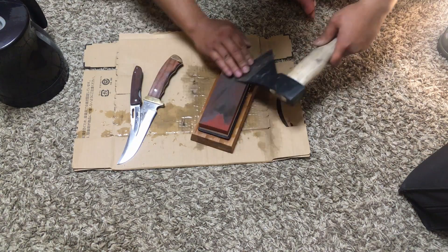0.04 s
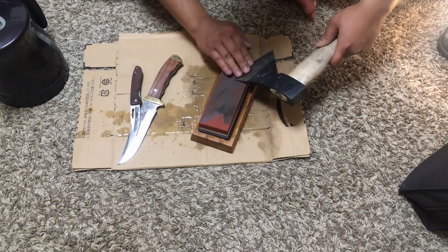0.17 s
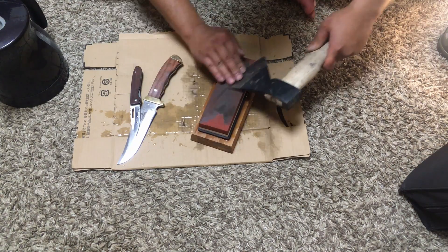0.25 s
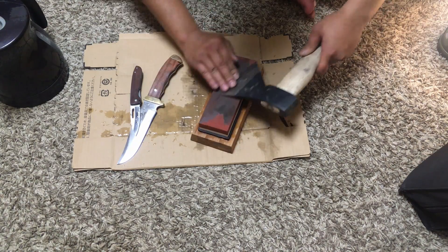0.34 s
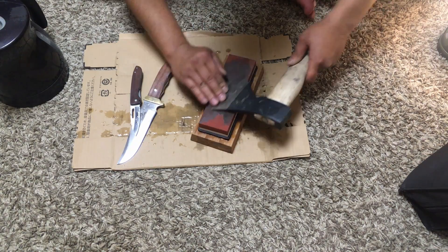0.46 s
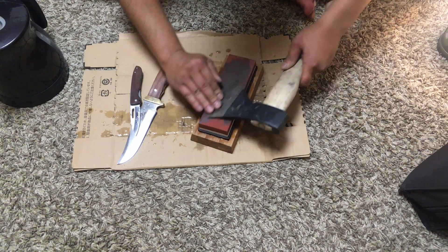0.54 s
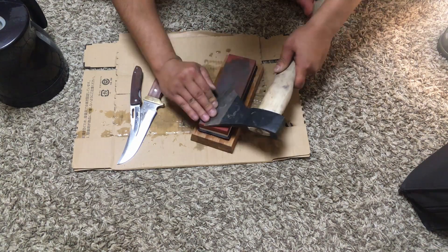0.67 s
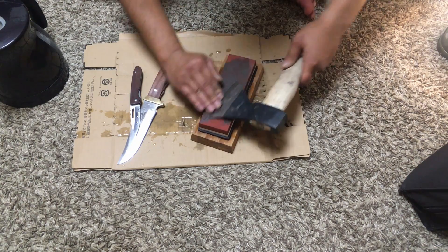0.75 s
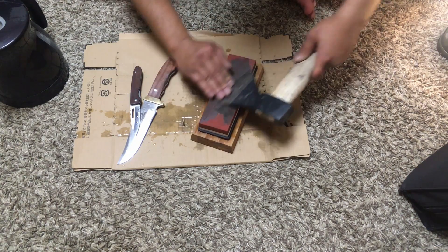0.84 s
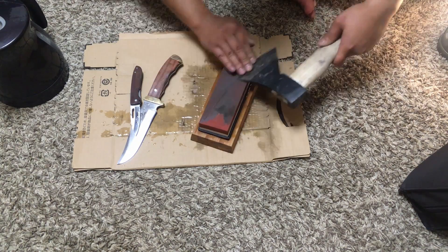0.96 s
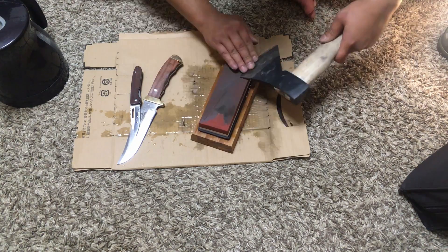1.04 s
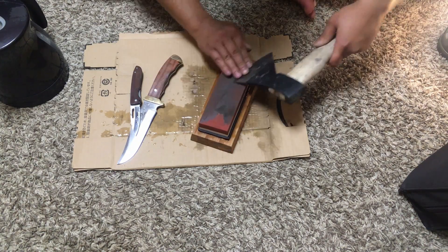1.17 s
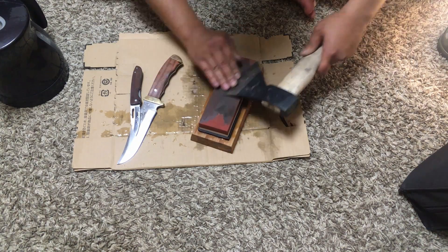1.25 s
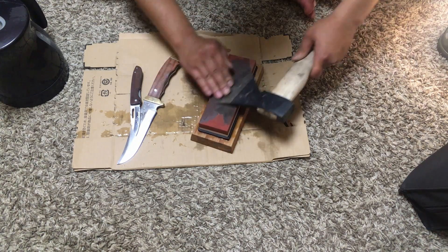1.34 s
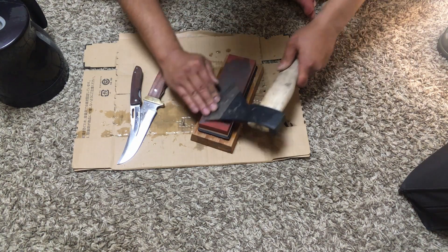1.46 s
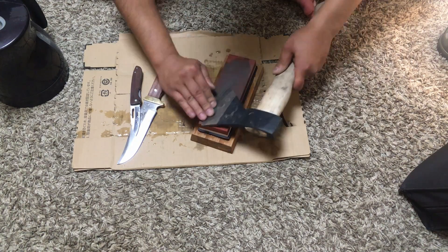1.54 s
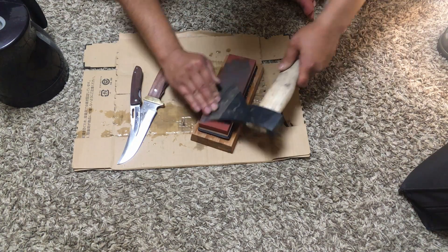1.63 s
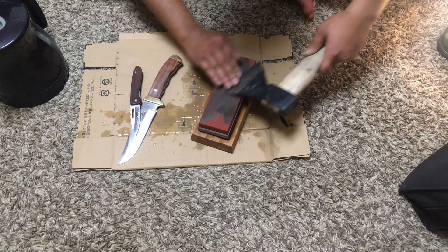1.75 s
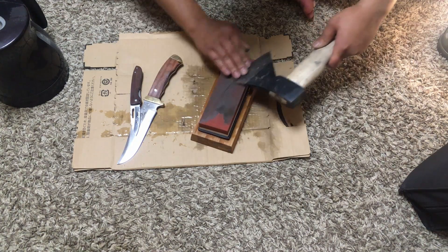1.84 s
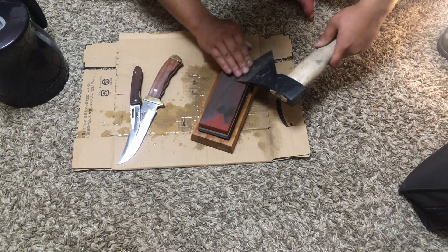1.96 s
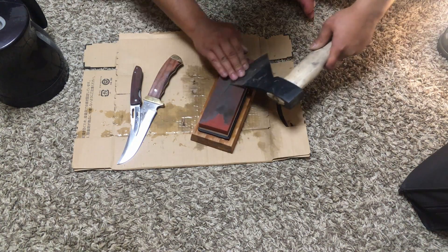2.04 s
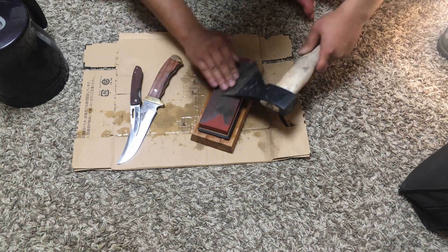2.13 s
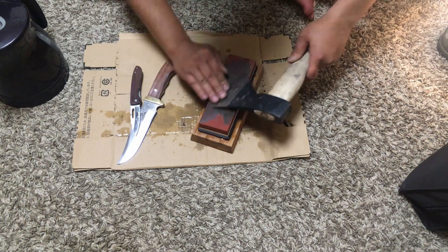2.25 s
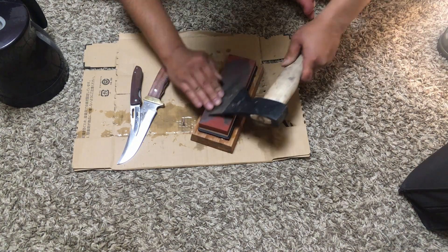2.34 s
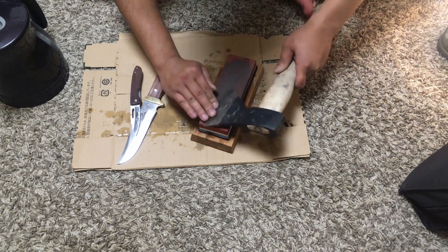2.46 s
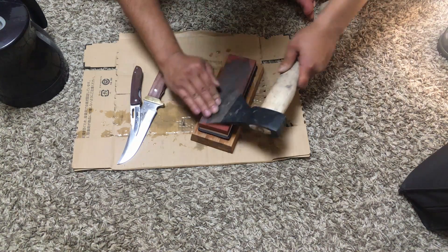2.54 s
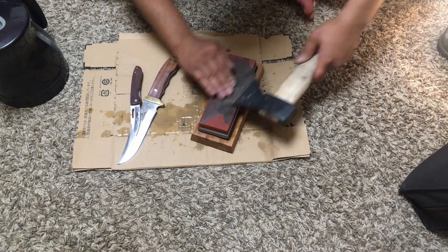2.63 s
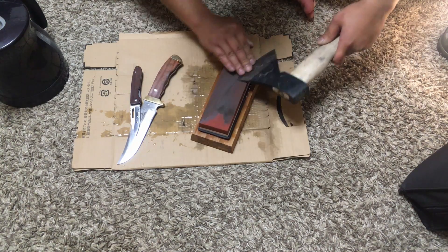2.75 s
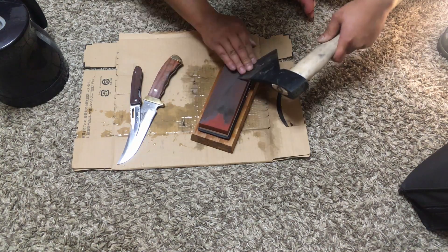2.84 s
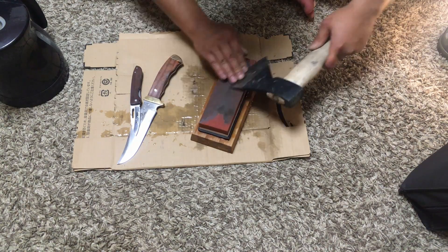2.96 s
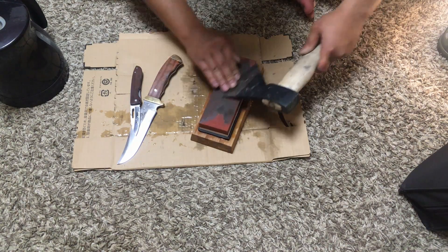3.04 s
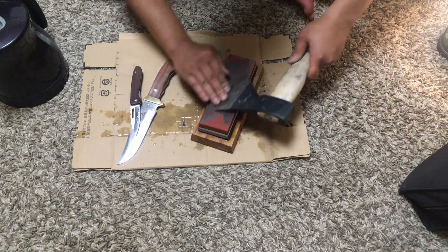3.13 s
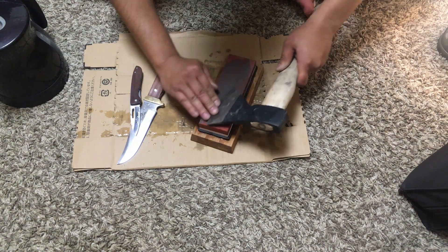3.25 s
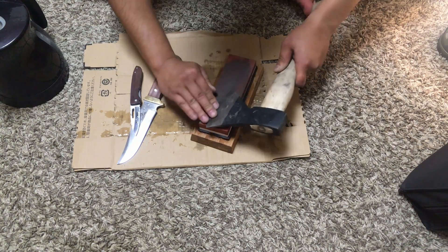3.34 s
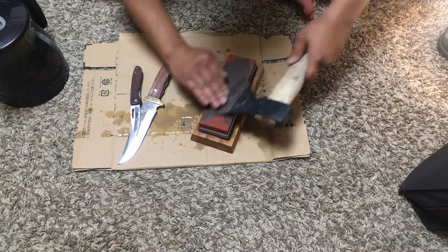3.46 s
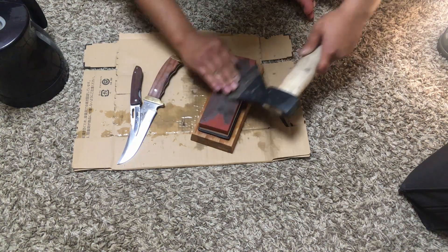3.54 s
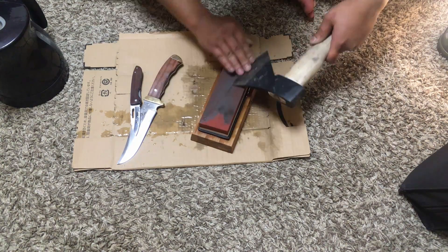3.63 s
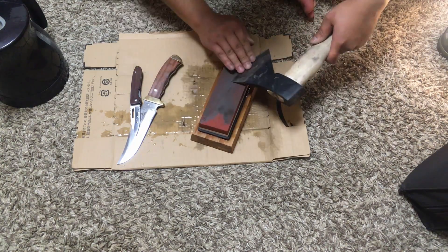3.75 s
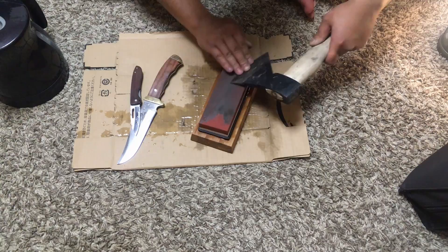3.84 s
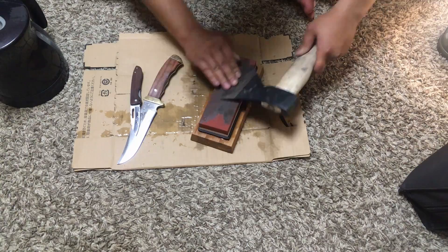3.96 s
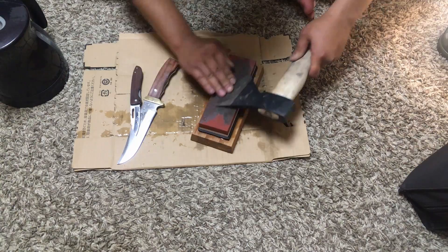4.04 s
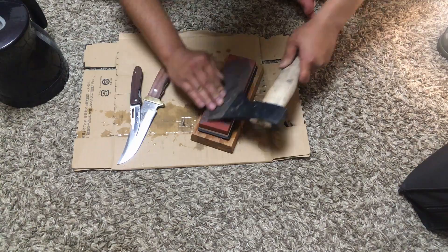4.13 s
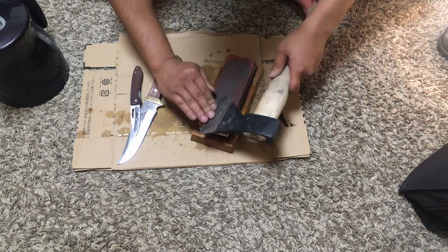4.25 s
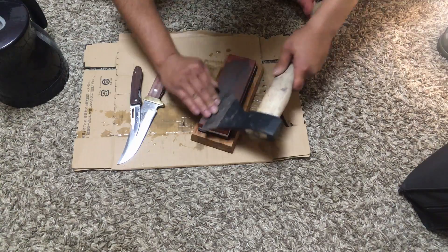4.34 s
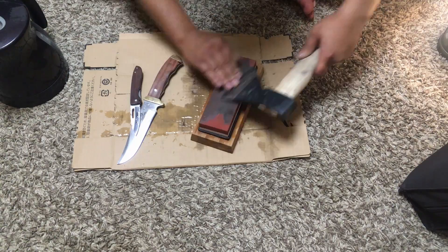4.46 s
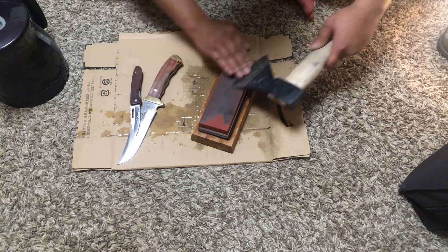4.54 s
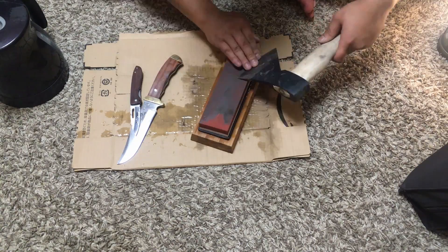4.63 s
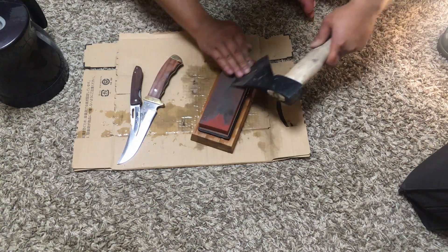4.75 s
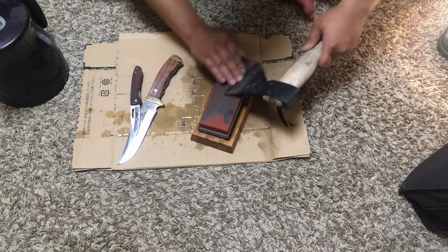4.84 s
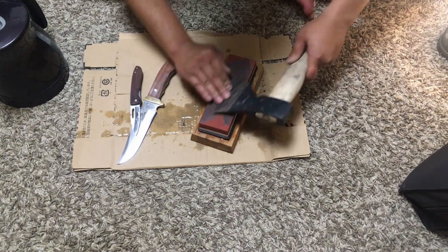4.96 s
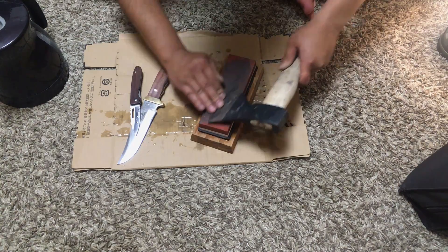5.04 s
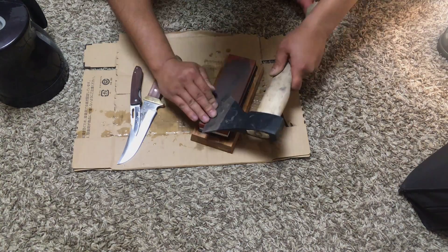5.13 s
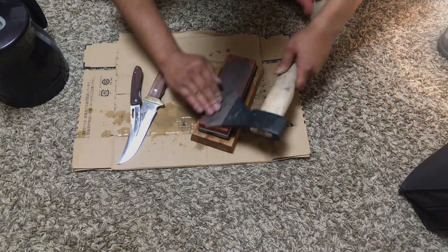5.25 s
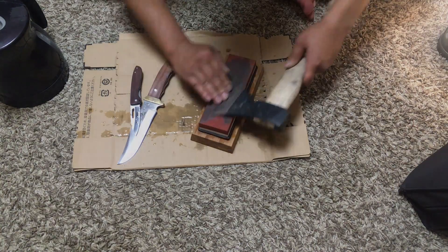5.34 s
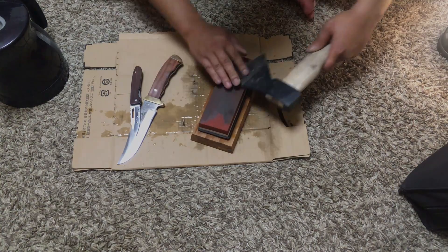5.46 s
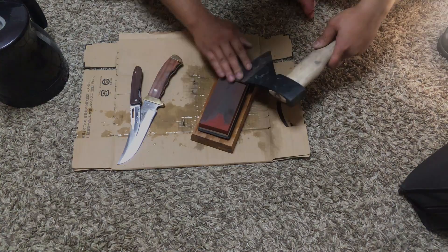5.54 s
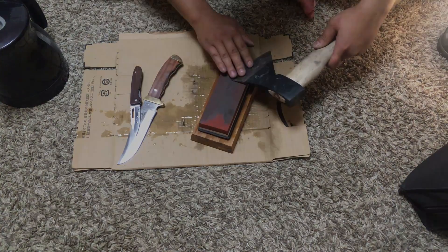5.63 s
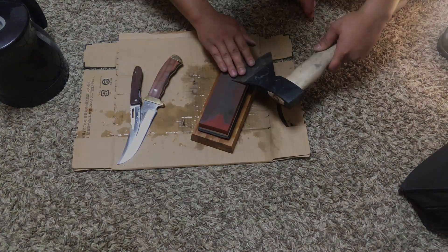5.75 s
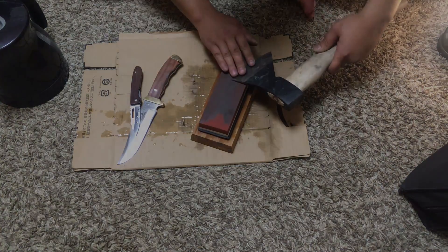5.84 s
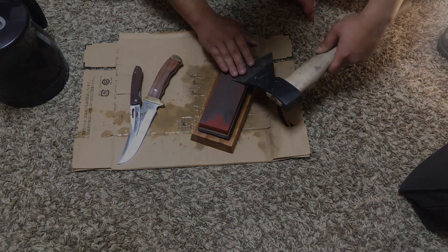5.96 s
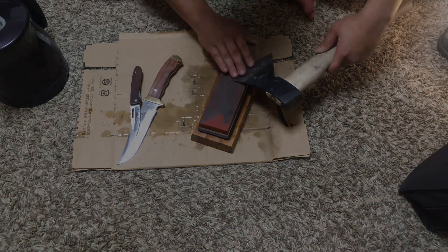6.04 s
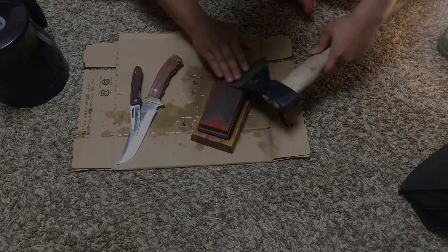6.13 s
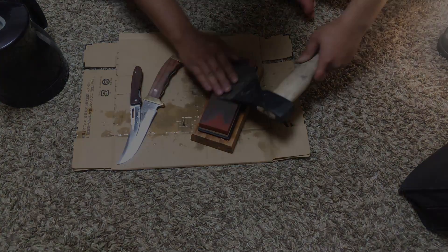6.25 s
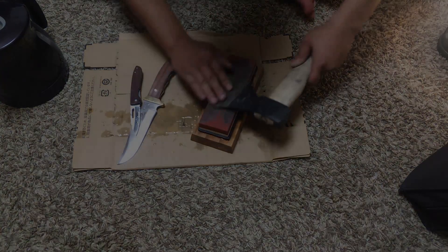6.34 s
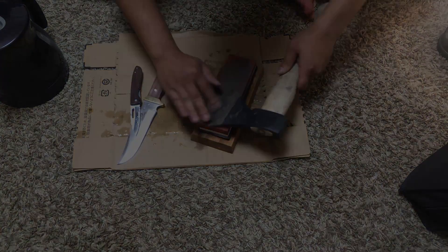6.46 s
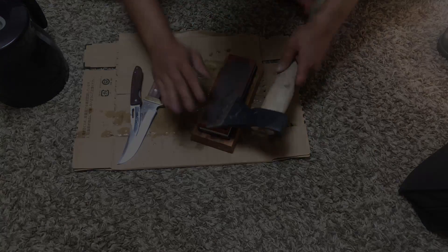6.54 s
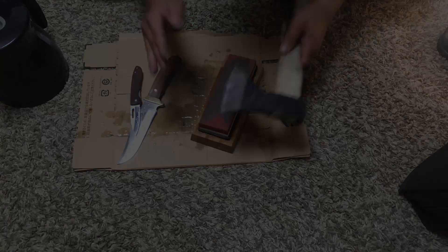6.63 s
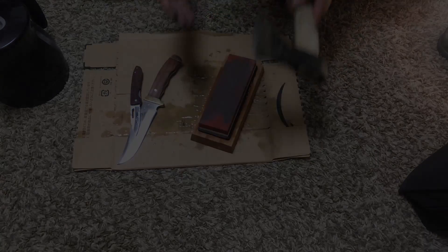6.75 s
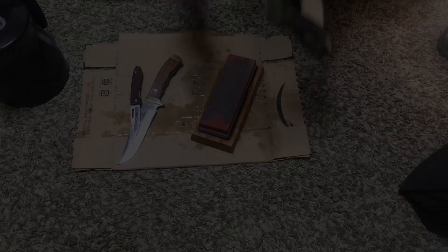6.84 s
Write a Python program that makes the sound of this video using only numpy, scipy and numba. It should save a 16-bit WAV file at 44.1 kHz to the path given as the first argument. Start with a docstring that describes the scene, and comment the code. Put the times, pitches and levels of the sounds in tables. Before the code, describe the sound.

An axe is honed on a wet whetstone in a quiet carpeted room, dry and heard only on the left. It opens mid-stroke with a bright, gritty rasp. Longer, softer pushes then alternate with brisk, louder returns, which peak at about 0.9, 1.8, 2.7, 3.6, 4.5 and 5.5 seconds. The grit makes the steel ring in high tones that slide up and down within each stroke, while the stone adds a hollow undertone. The stone knocks lightly on its wooden base around 1 second, most clearly at 1.8, and again at 4.9. From 5.6 seconds the work pauses, with two faint grazes. A last push runs from about 6.1 to 6.6 seconds, ending with a small scuff, a soft knock and a brief, thin ring as the axe lifts off. Faint low rumble, hum and hiss lie underneath, the hiss rising slightly at the end.

```python
"""A quiet carpeted room: an axe is stroked back and forth on a wet whetstone on a wooden base.
Grit rasps the edge and rings the steel head, whose resonances glide as the contact travels along the edge.
The stone adds a hollow undertone and rocks on its base, knocking. At the end the axe lifts off and
rings freely for a moment. Faint rumble, hum and hiss lie beneath. Only the left channel sounds."""
import sys
import numpy as np
from scipy import signal
from scipy.fft import rfft, irfft, next_fast_len
from scipy.io import wavfile
from scipy.ndimage import uniform_filter1d
from numba import njit

SR = 44100
rng = np.random.default_rng(int(sys.argv[2]) if len(sys.argv) > 2 else 0)


def transcribe(signal):
    """Save signal, clipped to [-1, 1], as a 16-bit WAV file at the path in sys.argv[1]."""
    frames = np.atleast_2d(signal).T
    limited = np.clip(frames, -1, 1)
    pcm = np.round(limited * 32767).astype(np.int16)
    wavfile.write(sys.argv[1], SR, pcm)


N = 303849
TIME = np.arange(N) / SR
HEEL, BELLY = 0.2005, 0.564   # places along the edge, 0-1


def friction(grains_per_s=7000, slurry_db=-3, judder_db=1.16, judder_hz=90):
    """Grit fractures in dense random clicks over the smooth shear of the slurry; the edge judders."""
    grains = rms_one(rng.choice([-1, 1], N) * (rng.random(N) < grains_per_s / SR))
    slurry = from_db(slurry_db) * rng.standard_normal(N)
    return (grains + slurry) * from_db(judder_db * drift(judder_hz))


# Second and third gliding modes. Each row: free frequency in Hz, level in dB.
UPPER_GLIDES = [(5110, -2), (9210, 5.5)]
# Modes drawn along by the third glide. Each row: free frequency in Hz, share of its shift,
# width in Hz, level in dB, extra dB per dB of bearing.
EDGE_MODES = [(6903, 0.074, 530, -9.5, -1.1), (8144, 0.063, 160, -4, 1.5), (8900, 0.25, 840, -6, 1.14),
              (11120, 0.17, 270, -4.5, 0.2), (12840, 0.092, 490, -4, 0.9), (14200, .05, 300, -7.5, 1.2)]
# Thin bevel's mode. One row: centre in Hz, swing in Hz, period in edge lengths, level in dB.
BEVEL_MODE = (14650, 330, 0.305, 0)
# Direct sound of the grit. Each row: frequency in Hz, gain in dB.
RASP_SPECTRUM = [(300, -27.5), (1500, -3.5), (2300, -9.5), (2900, 1.5), (4700, -0.5), (6400, 1),
                 (9500, -24), (10500, -3.5), (14500, 8), (16000, -12)]


def edge(force, place, first_hz, second_hz, third_hz, bearing_db, excess_db, glide_width_hz=270,
         rise_db_per_khz=4.5, twist_hz=7970, damping=0.25, tilt_db=3, tilt_hz=6, grit_db=-20):
    """The thin edge rings in high modes over the direct rasp of the grit."""
    (second_free_hz, second_db), (third_free_hz, third_db) = UPPER_GLIDES
    shift_hz = third_hz - third_free_hz
    rise_db = rise_db_per_khz * (second_hz - second_free_hz) / 1000
    # Each row: frequency in Hz, free frequency in Hz, width in Hz, level in dB.
    modes = [(second_hz, second_free_hz, glide_width_hz, second_db + rise_db),
             (third_hz, third_free_hz, glide_width_hz, third_db)]
    for free_hz, share, width_hz, db, follows in EDGE_MODES:
        modes.append((free_hz + share * shift_hz, free_hz, width_hz, db + follows * bearing_db))
    # A twisting mode rises with the first glide and moves against the third.
    twist_shift_hz = 0.5 * (first_hz - first_hz.mean()) - 0.26 * shift_hz
    modes.append((twist_hz + twist_shift_hz, twist_hz, 350, -3))
    bevel_hz, swing_hz, period, bevel_db = BEVEL_MODE
    ripple_hz = 230 * drift(tilt_hz) - swing_hz * np.cos(2 * np.pi * (place - HEEL) / period)
    modes.append((bevel_hz + ripple_hz, bevel_hz, 640, bevel_db + 0.23 * excess_db))
    steel = 0
    for hz, free_hz, width_hz, db in modes:
        loaded_hz = width_hz + damping * np.abs(hz - free_hz)   # pulled further, damped more
        gain = from_db(db + tilt_db * drift(tilt_hz))   # small tilts favour one mode or another
        steel += gain * width_hz / loaded_hz * resonate(scatter(force), hz, loaded_hz)
    return steady(steel + from_db(grit_db) * colour(force, RASP_SPECTRUM))


# Stationary modes. Each row: frequency in Hz, width in Hz, level in dB, extra dB per dB of bearing.
BENDING_MODES = [(1767, 237, -11.5, 0.6), (2745, 131, -0.5, 1), (2912, 102, -1.5, -0.5),
                 (3192, 210, 1.5, -.15), (3610, 350, -10.5, 0.4), (3820, 203, -3.5, 0.5)]


def head(force, first_hz, bearing_db, glide_db=-2.5, rise_db_per_khz=7, pivot_hz=3700, cluster_db=-2):
    """The thick head rings in a cluster of bending modes; the first glide sings out as it climbs."""
    cluster = sum(from_db(db + follows * bearing_db) * resonate(scatter(force), hz, width_hz)
                  for hz, width_hz, db, follows in BENDING_MODES)
    rise_db = rise_db_per_khz * (first_hz - pivot_hz) / 1000
    wobble_hz = 45 * drift(rate_hz=12)
    glide = steady(resonate(force, first_hz + wobble_hz, width_hz=300))
    return from_db(glide_db + rise_db) * glide + from_db(cluster_db + bearing_db) * steady(cluster)


# Outward strokes. Each row: start, heel passage, belly passage and end in seconds, place reached 0-1,
# draw on the first glide past the belly 0-1, level in dB, hardest lean in seconds, lean gain in dB,
# stone offset in dB.
PUSHES = [(0.16, 0.29, 0.59, 0.73, .78, .55, -49.2, 0.59, 6, 4.5),
          (1.118, 1.27, 1.5, 1.63, .76, .55, -47.2, 1.56, 4, 3),
          (1.96, 2.134, 2.29, 2.535, .89, 1, -48.6, 2.437, 2.5, -1),
          (2.855, 2.99, 3.12, 3.388, .99, 1, -47.7, 3.261, 4.5, -1),
          (3.826, 3.917, 4.06, 4.337, .9, .97, -48.7, 4.222, 4.3, 0),
          (4.675, 4.792, 4.98, 5.226, .9, .95, -48.8, 5.098, 5.2, 0),
          (6.068, 6.189, 6.35, 6.605, .88, 1, -49.7, 6.486, 6, 0)]
# Brisk return strokes. Each row: start, heel passage, peak and end in seconds, peak level in dB,
# stone offset in dB.
PULLS = [(-0.25, -0.1, 0, 0.158, -39, -1), (0.723, 0.803, 0.938, 1.101, -37.6, 1),
         (1.62, 1.742, 1.788, 1.969, -36, -1), (2.53, 2.649, 2.697, 2.89, -36.8, 1),
         (3.376, 3.552, 3.572, 3.78, -37.8, 0), (4.323, 4.505, 4.52, 4.709, -37, -1),
         (5.238, 5.46, 5.478, 5.647, -34.7, -1)]
# The axe grazes the stone in the pause. Each row: time in seconds, half length in seconds, level in dB.
GRAZES = [(5.673, 0.029, -66.5), (5.863, 0.03, -61.5)]
# The edge catches on coarse grit. Each row: time in seconds, gain in dB.
GRIT_CATCHES = [(1.204, 6), (2.07, 2), (3.98, 7), (4.91, 6), (6.24, 1.5), (6.32, 4)]
PUSH_ATTACK_S, PUSH_RELEASE_S = 0.13, 0.083
PULL_ATTACK_S, PULL_RELEASE_S = 0.035, 0.089


def stroke_effort(resting_db=-72, swell_db_per_s=86, sag_db_per_s=75, tremor_db=1.11, tremor_hz=14):
    """Strength of the rasp: pushes hold level until the hand leans in, pulls swell and sag."""
    effort = from_db(resting_db) + sum(from_db(db) * swell(s, half_s) for s, half_s, db in GRAZES)
    for start, _, _, end, _, _, db, lean_s, lean_db, _ in PUSHES:
        level = from_db(db + lean_db * swell(lean_s, half_s=0.04))
        effort += level * gate(start, end, PUSH_ATTACK_S, PUSH_RELEASE_S)
    for start, _, peak, end, db, _ in PULLS:
        below_db = np.maximum(swell_db_per_s * (peak - TIME), sag_db_per_s * (TIME - peak))
        effort += from_db(db - below_db) * gate(start, end, PULL_ATTACK_S, PULL_RELEASE_S)
    catch_db = sum(db * swell(s, half_s=0.018) for s, db in GRIT_CATCHES)
    return effort * from_db(catch_db + tremor_db * drift(tremor_hz))


# Gliding modes by contact point. Each row: place 0-1, first, second and third frequency in Hz.
GLIDES_BY_PLACE = [(0, 3150, 5860, 9840), (.06, 3650, 6000, 10050), (.12, 3880, 5700, 8970),
                   (.2, 3930, 5100, 10100), (.32, 3370, 5640, 9500), (.42, 3150, 6060, 9200),
                   (.5, 3270, 5960, 9600), (.55, 3540, 5800, 10800), (.7, 4040, 5240, 10050),
                   (.77, 4370, 5500, 9200), (1, 4070, 5640, 9900)]


def travelling_contact(push_from=0.055, pull_from=0.467, pull_draw=0.66, first_rest_hz=3120):
    """The contact runs out along the edge and back; its place tunes three gliding modes."""
    path = []   # Each row: time in seconds, place 0-1, share of the first glide's shift from rest.
    for start, heel_s, belly_s, end, reach, draw, *_ in PUSHES:
        path += [(start, push_from, 1), (heel_s, HEEL, 1), (belly_s, BELLY, 1),
                 ((belly_s + end) / 2, (BELLY + reach) / 2, draw),
                 (end - PUSH_RELEASE_S / 2, reach, draw)]
    for start, heel_s, _, end, *_ in PULLS:
        path += [(start + PULL_ATTACK_S / 2, pull_from, pull_draw), (heel_s, HEEL, pull_draw),
                 (end - PULL_RELEASE_S, 0, pull_draw)]
    place, draw = in_time(sorted(path))
    place += 0.011 * drift(rate_hz=14)   # uneven hand
    places, *columns = np.transpose(sorted(GLIDES_BY_PLACE))
    first_hz, second_hz, third_hz = [np.interp(place, places, hz) for hz in columns]
    return place, first_rest_hz + draw * (first_hz - first_rest_hz), second_hz, third_hz


# Weight through a push and through a pull. Each row: share of the stroke, head's bearing in dB,
# stone pitch in Hz, stone level in dB.
PUSH_WEIGHT = [(.1, 2, 1190, -4.5), (.5, -3.5, 1263, -4.5), (.72, -5.5, 1310, 2), (.95, -1, 1250, 3)]
PULL_WEIGHT = [(.05, -3, 1210, 5), (.22, -4, 1053, -0.5), (.4, -1, 920, -7), (.55, 1, 1130, -5),
               (.85, 4, 1133, 2)]


def weight_shift():
    """Weight shifts in each stroke, setting how hard the head bears and the stone's pitch and level."""
    rows = []
    for strokes, shape in ((PUSHES, PUSH_WEIGHT), (PULLS, PULL_WEIGHT)):
        for start, _, _, end, *_, stone_db in strokes:
            for share, bearing_db, hz, db in shape:
                rows.append((start + share * (end - start), bearing_db, hz, db + stone_db))
    return in_time(sorted(rows))


def stone(force, pitch_hz, level_db, upper_db=-9, tilt_db=3):
    """The stone under the axe gives a hollow undertone from two broad resonances."""
    upper_gain = from_db(upper_db + tilt_db * drift(rate_hz=2.74))
    upper = upper_gain * resonate(scatter(force), hz=1800, width_hz=450)
    return from_db(level_db) * steady(resonate(force, pitch_hz, width_hz=230) + upper)


# Short knocks and rattles from the base, mostly as the stone rocks. Each row: start in seconds, level in dB.
KNOCKS = [(0.921, -41), (1.0, -39), (1.767, -34.5), (4.905, -42), (6.539, -48)]
# Modes of the base. Each row: frequency in Hz, level in dB, T60 in seconds.
WOOD_MODES = [(310, -3.5, 0.21), (374, -6.5, 0.092), (547, -9.5, 0.031), (630, -8.5, 0.029),
              (863, -3.5, 0.032), (1083, -21, 0.2)]


def wooden_base(force, bearing_db, knock_db=-9, rattle_s=0.022, rub_db=-51):
    """The base grumbles as the head bears down and knocks in short rattles when the stone rocks."""
    drive = from_db(rub_db + bearing_db) * force
    for start_s, db in KNOCKS:
        onset = int(start_s * SR)
        rattle = rng.standard_normal(N - onset) * np.exp(-TIME[:N - onset] / rattle_s)
        drive[onset:] += from_db(db + knock_db) * rattle / np.linalg.norm(rattle)
    return sum(from_db(db) * ring(drive, hz, t60_s) for hz, db, t60_s in WOOD_MODES)


# Modes of the released steel. Each row: frequency in Hz, level in dB, T60 in seconds.
FREE_STEEL_MODES = [(5060, -2, 0.11), (9210, -18, 0.79), (14270, -2, .22)]


def lift_off(force, at_s=6.547, ring_db=-48, scuff_db=-52):
    """The edge scuffs the stone as it leaves; released, the steel rings freely."""
    release = np.zeros(N)
    release[int(at_s * SR)] = from_db(ring_db)
    scuff = from_db(scuff_db) * swell(at_s, half_s=0.011) * rms_one(band(force, 700, 4000))
    return scuff + sum(from_db(db) * ring(release, hz, t60_s) for hz, db, t60_s in FREE_STEEL_MODES)


def room(x, t60_s=0.064, wet_db=-12, gap_s=0.0035):
    """The carpeted room adds a short, weak tail."""
    age = TIME[:SR // 2]
    tail = rng.standard_normal(len(age)) * from_db(-60 * age / t60_s) * (age > gap_s)
    return x + from_db(wet_db) * signal.fftconvolve(x, tail / np.linalg.norm(tail))[:N]


# Room rumble. Each row: frequency in Hz, gain in dB.
RUMBLE_SPECTRUM = [(26, -53), (41, -2.5), (56, 2), (85, -2.5), (130, -6.5), (185, -8), (250, -5),
                   (330, -16.5), (450, -21.5), (750, -24.5), (2000, -35), (5000, -60), (16000, -43.5)]
# Wavering hum. Each row: frequency in Hz, width in Hz, level in dB.
HUM_BANDS = [(148.3, 10.8, -73.5), (243.3, 33, -67.5), (301.3, 6.4, -69.5)]
# Hiss dips, then swells once the work stops. Each row: time in seconds, level in dB.
HISS_LEVELS = [(6.5, -79), (6.62, -89), (6.72, -68.5), (6.89, -67.5)]


def background(rumble_db=-59):
    """Low room rumble, a wavering hum and faint hiss."""
    rumble = from_db(rumble_db) * rms_one(colour(rng.standard_normal(N), RUMBLE_SPECTRUM))
    hum = sum(from_db(db) * rms_one(resonate(rng.standard_normal(N), hz, width_hz))
              for hz, width_hz, db in HUM_BANDS)
    hiss_db, = in_time(HISS_LEVELS)
    hiss = from_db(hiss_db) * rms_one(band(rng.standard_normal(N), 1500, 14700, order=1))
    return rumble + hum + hiss


def from_db(db):
    """Decibels to gain."""
    return 10 ** (np.asarray(db) / 20)


def rms_one(x):
    """Scale to unit rms."""
    return x / np.sqrt(np.mean(x ** 2) + 1e-20)


def steady(x):
    """Even out the slow level, keep the grain."""
    power = uniform_filter1d(uniform_filter1d(x ** 2, size=1500), size=1500)
    return x / np.sqrt(np.abs(power) + 1e-20)


def in_time(rows):
    """Interpolate timed rows to one value per sample for each column."""
    times_s, *columns = np.transpose(rows)
    return [np.interp(TIME, times_s, column) for column in columns]


def swell(at_s, half_s):
    """Bell curve of height 1."""
    return np.exp(-((TIME - at_s) / half_s) ** 2)


def gate(start_s, end_s, attack_s, release_s):
    """The hand gets under way, holds its speed and slows for the turn."""
    rise = np.clip((TIME - start_s) / attack_s, 0, 1)
    fall = np.clip((end_s - TIME) / release_s, 0, 1)
    return (np.sin(np.pi / 2 * rise) * np.sin(np.pi / 2 * fall)) ** 2


def drift(rate_hz, hop=40, warm_up=2000):
    """Slow random wander of unit rms."""
    r = np.exp(-2 * np.pi * rate_hz * hop / SR)
    noise = rng.standard_normal(N // hop + warm_up + 2)
    slow = signal.lfilter([1], [1, -2 * r, r * r], noise)[warm_up:]
    return np.interp(np.arange(N) / hop, np.arange(len(slow)), rms_one(slow))


def scatter(force):
    """Each grain meets each mode with a sign of its own."""
    return force * rng.choice([-1, 1], N)


def colour(x, spectrum):
    """Filter by a smooth spectrum."""
    hz, db = np.transpose(spectrum)
    size = next_fast_len(N + SR // 10)
    bins_hz = np.maximum(np.arange(size // 2 + 1) * SR / size, 1)
    gain = from_db(np.interp(np.log(bins_hz), np.log(hz), db))
    return irfft(rfft(x, size) * gain, size)[:N]


def band(x, low_hz, high_hz, order=2):
    """Butterworth band-pass."""
    return signal.sosfilt(signal.butter(order, [low_hz, high_hz], "band", fs=SR, output="sos"), x)


@njit
def spin(x, poles):
    """Decaying rotation whose speed may change at every sample."""
    out, state = np.empty(len(x)), 0j
    for i in range(len(x)):
        state = state * poles[i] + x[i]
        out[i] = state.real
    return out


def resonate(x, hz, width_hz):
    """Steep-sided resonance, steady or gliding, with peak gain 1."""
    r = np.exp(-np.pi * width_hz / SR)
    poles = r * np.exp(2j * np.pi * hz / SR) * np.ones(N)
    return 4 * (1 - r) ** 2 * spin(spin(x, poles), poles)


def ring(x, hz, t60_s):
    """A unit click starts a decaying sine of height 1."""
    r, w = from_db(-60 / (t60_s * SR)), 2 * np.pi * hz / SR
    return signal.lfilter([0, np.sin(w)], [1, -2 * r * np.cos(w), r * r], x + 1e-18)


def scene(head_db=-8, stone_db=-12, brisk_db=-58, head_lag=0.26, stone_lag=0.6, master_gain=2):
    """One friction force drives edge, head, stone and base."""
    force, effort = friction(), stroke_effort()
    place, first_hz, second_hz, third_hz = travelling_contact()
    bearing_db, pitch_hz, load_db = weight_shift()
    # A brisk stroke is brighter: the heavy parts gain less than the edge.
    excess_db = np.maximum(20 * np.log10(effort) - brisk_db, 0)
    scrape = edge(force, place, first_hz, second_hz, third_hz, bearing_db, excess_db)
    scrape += from_db(head_db - head_lag * excess_db) * head(force, first_hz, bearing_db)
    scrape += from_db(stone_db - stone_lag * excess_db) * stone(force, pitch_hz, load_db)
    honing = effort * scrape + wooden_base(effort * force, bearing_db) + lift_off(force)
    left = master_gain * (room(honing) + background())
    return np.array([left, np.zeros(N)])


def record(dry, cutoff_hz=15850):
    """A steep low-pass cuts the top."""
    return signal.sosfilt(signal.ellip(12, .1, 90, cutoff_hz, fs=SR, output="sos"), dry)


dry = scene()
out = record(dry)
transcribe(out)
```